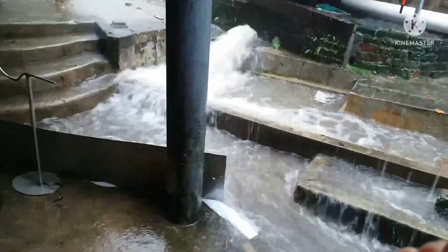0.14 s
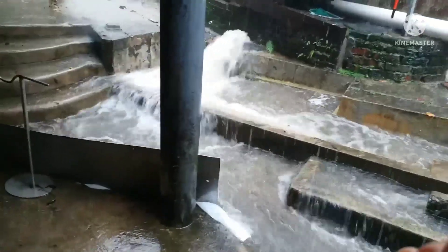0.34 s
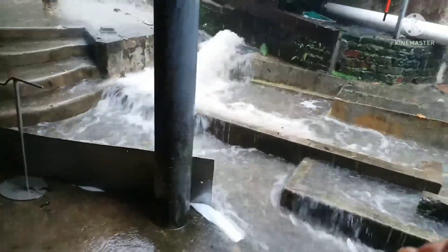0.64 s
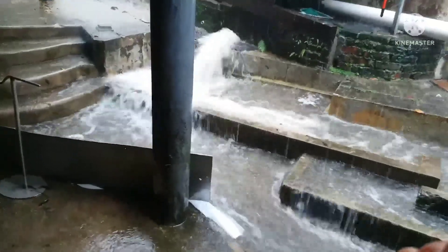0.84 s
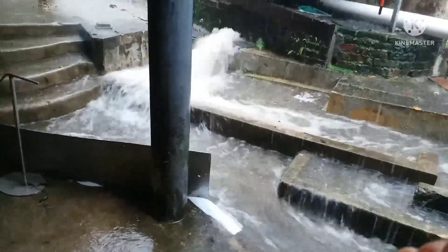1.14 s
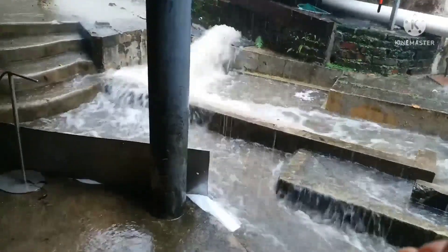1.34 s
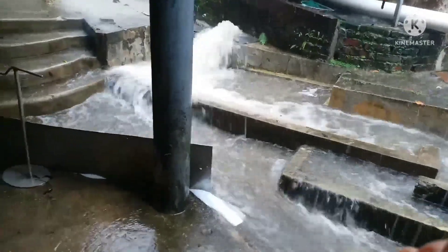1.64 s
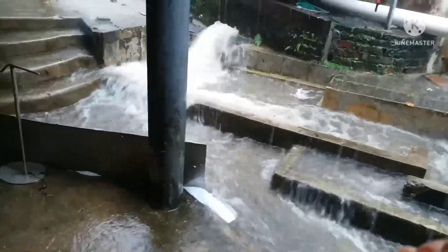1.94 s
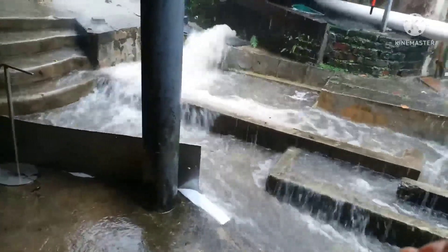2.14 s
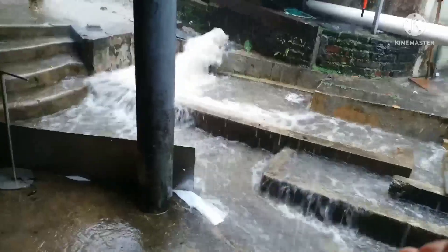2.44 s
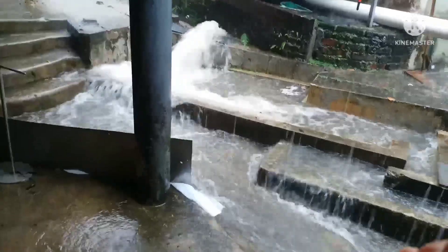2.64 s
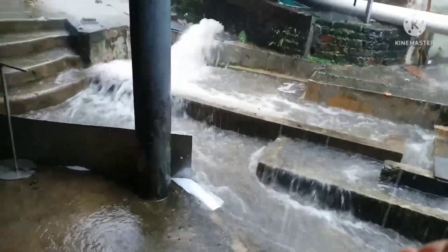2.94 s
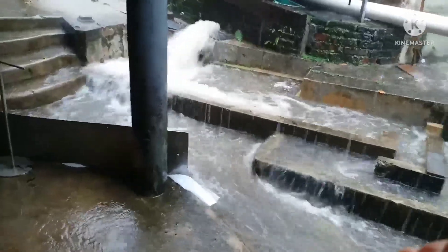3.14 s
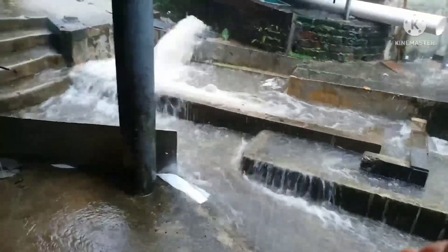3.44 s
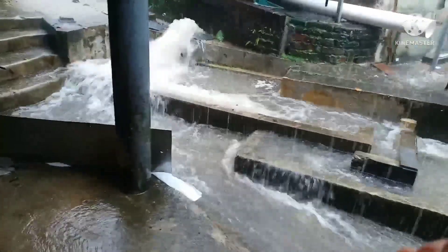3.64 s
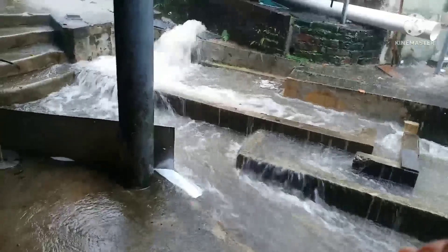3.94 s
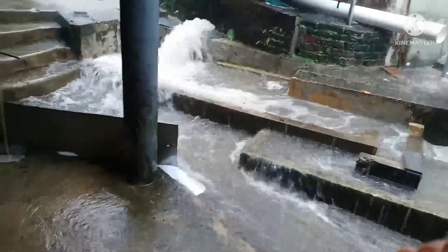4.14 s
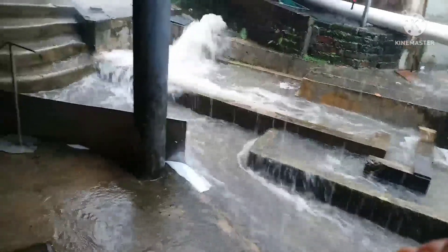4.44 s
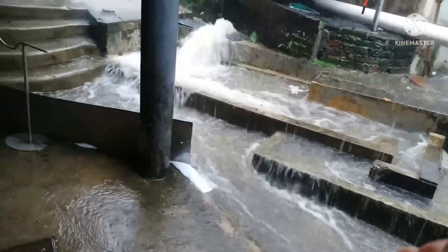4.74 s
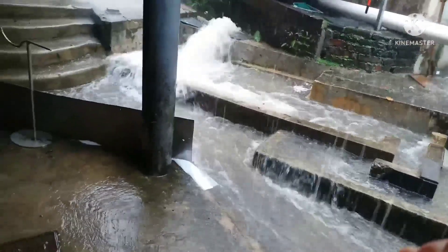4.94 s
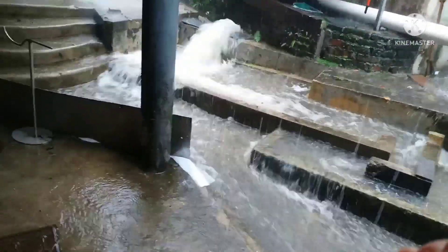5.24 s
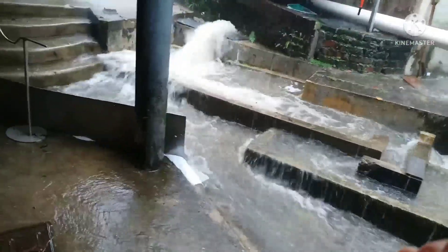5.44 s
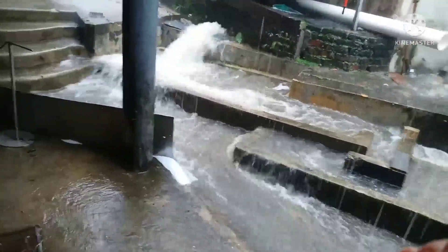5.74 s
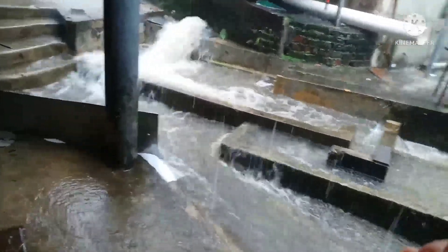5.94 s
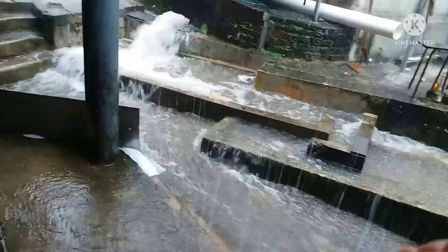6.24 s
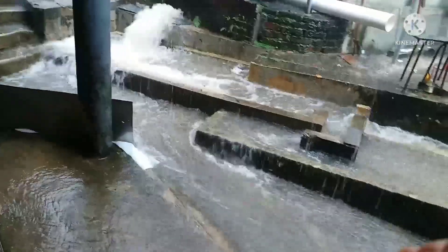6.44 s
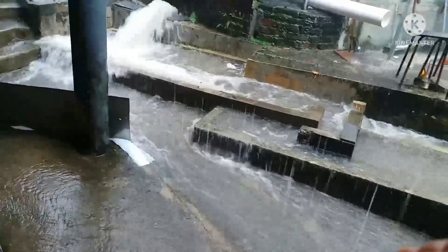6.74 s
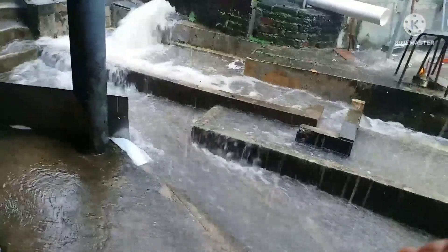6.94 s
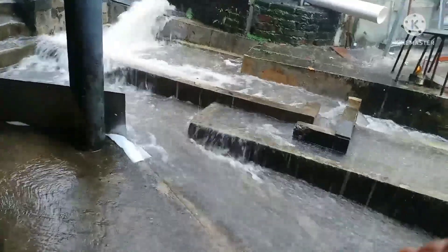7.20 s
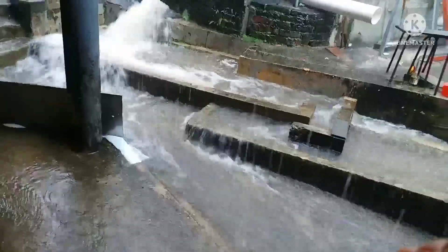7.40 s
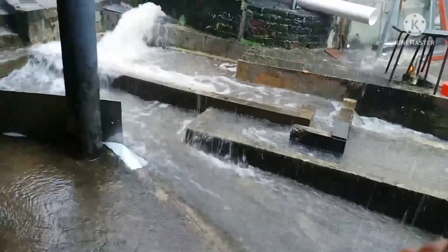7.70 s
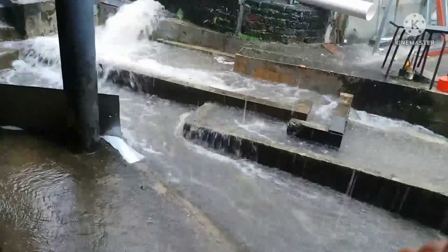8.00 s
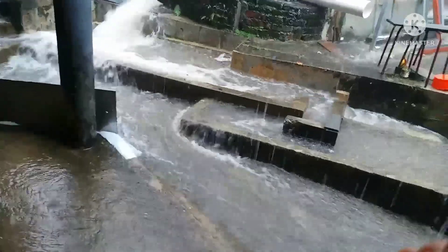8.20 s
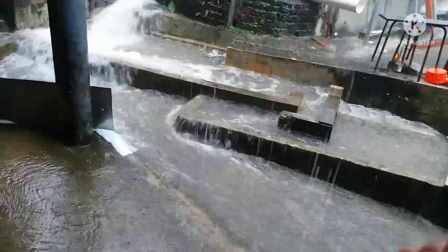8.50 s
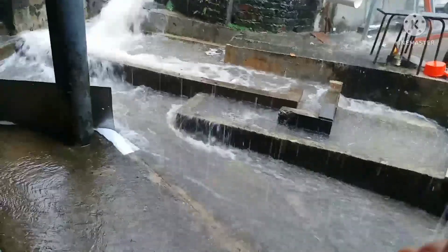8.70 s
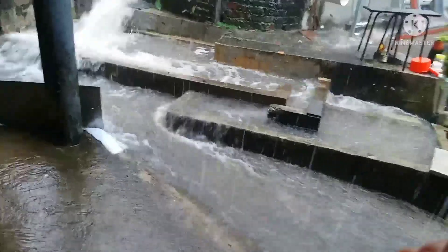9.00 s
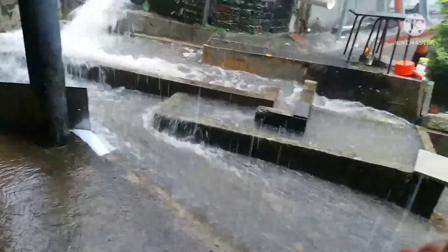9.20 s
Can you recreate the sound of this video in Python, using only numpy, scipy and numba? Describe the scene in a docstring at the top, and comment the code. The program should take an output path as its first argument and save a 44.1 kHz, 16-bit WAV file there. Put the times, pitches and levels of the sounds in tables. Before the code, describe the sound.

Heard in stereo on a phone sheltered under a porch, a wide, steady rush of floodwater cascades over concrete steps in heavy rain. Fine bubbling and ticking raindrops sit over the roar throughout, while heavy drips snap irregularly on the wet floor nearby, leaning right. The water dips a little early on, swells after halfway, then softens and rises toward the end.

```python
"""Floodwater pours down concrete steps in heavy rain, heard from under a porch roof on a two-port phone.
From the start, countless far splashes merge into a roar from all sides; nearer bubbles and raindrops fizz
over it, big drops smack close by, mostly on the right, and now and then a single bubble rings out.
The flow ebbs to its lowest near 3 s. At 4.2 s the boom of the air under the roof sinks in pitch;
the water surges highest near 5.3 s, eases, and builds again toward the end."""
import sys
import numpy as np
from scipy import signal
from scipy.fft import rfft, irfft, next_fast_len
from scipy.io import wavfile
from scipy.ndimage import uniform_filter1d
from numba import njit

SR = 44100
rng = np.random.default_rng(int(sys.argv[2]) if len(sys.argv) > 2 else 0)


def digitize_waveform(pressure):
    """Quantize a signal to 16-bit integers and store it at the path in sys.argv[1].

    Rows of a 2-D input are taken as channels; values are limited to [-1, 1].
    """
    field = np.atleast_2d(pressure).T
    bounded = np.clip(field, -1, 1)
    quanta = np.round(bounded * 32767).astype(np.int16)
    wavfile.write(sys.argv[1], SR, quanta)


N = 412776
FFT_SIZE = 2 * next_fast_len(N // 2 + 1)
PORT_GAP_S = 0.00051  # sound's travel time from one microphone port to the other


def roar(hz, spray_db, churn_db, plunge_db):
    """Far splashes too dense to tell apart: plunge in the bass, churn above it, flickering spray on top."""
    noise = surrounding_noise(hz)
    centres_hz = [200, 400, 800, 1600, 3000, 4500, 6300, 8500, 11000, 14000]
    band_index = np.interp(np.log(hz + 1), np.log(centres_hz), np.arange(len(centres_hz)))
    burst_db = spray_bursts()
    shared_db = 0.36 * flicker(34, drift_s=.09)
    out = 0
    for k in range(len(centres_hz)):
        band = np.clip(1 - abs(band_index - k), 0, 1)
        high, low = np.clip((k - 2) / 2, 0, 1), np.clip((1.5 - k) / 1.6, 0, 1)
        own_db = (.5 + 0.032 * k) * high * flicker(34, drift_s=.09)
        treble_db = spray_db + np.clip((k - 3) / 2, 0, 1) * burst_db + shared_db + own_db
        db = high * treble_db + (1 - high - low) * churn_db + low * plunge_db
        out = out + undb(db) * irfft(noise * band)[:, :N]
    return unit(out)


def surrounding_noise(hz):
    """Spectra of noise from all sides: alike at both ports only while the wavelength dwarfs their gap."""
    right_share, unlike_rumble = 0.055, .13
    left, independent = rfft(rng.standard_normal((2, FFT_SIZE)))
    around = (1 - right_share - unlike_rumble / (1 + (hz / 60) ** 2)) * np.sinc(2 * hz * PORT_GAP_S)
    alike = around + right_share * np.exp(2j * np.pi * hz * PORT_GAP_S * 0.75)
    right = alike * left + np.sqrt(1 - np.minimum(abs(alike) ** 2, 1)) * independent
    return np.array([left, right])


def spray_bursts():
    """Brief swells of treble hiss, in dB, as sheets of water burst into spray."""
    # swells (time [s], lift [dB], length [s]); rows at 0 dB are silent
    bursts = [(.23, 0, .05), (.35, 1.5, .06), (2.032, 1.5, 0.045), (2.6, 1.5, .05), (3.025, 1.2, .05),
              (5.33, 0, 0.11), (5.7, 0, .05), (6.33, 1.5, .06), (7.823, 1, .08), (8.42, 2.5, 0.045),
              (8.6, 3, .06), (8.953, 1.2, 0.068)]
    t = np.arange(N) / SR
    return sum(db * np.exp(-(2 * (t - s) / length) ** 2) for s, db, length in bursts)


def roof_drops(droplet_count=20, lesser_count=20):
    """Heavy drops off the roof edge, close by: a snap, its echo off the wet floor, scattering droplets."""
    # big drops (time [s], level at the nearer port [dB], pitch [Hz], left minus right [dB],
    # side [-1 left to 1 right], swell [cycles])
    big_drops = [(0.3415, -3, 10500, -10, .4, .5), (0.4628, -6, 3800, -6, .52, .55),
                 (0.5223, -9, 3800, -8, .3, .55), (0.7288, -12, 3200, -4, .45, .8),
                 (0.7772, -11, 3300, -6, .2, .55), (0.9127, -7, 4100, -8, .43, .5),
                 (1.5214, -10, 3350, -4, .48, .85), (1.6009, -10, 2600, -6, .3, .5),
                 (1.9553, -10, 7300, -7, .4, .5), (2.2089, -3.5, 2850, -6, .57, .48),
                 (2.2185, -13, 3100, -5, .5, .6), (2.2547, -12.5, 5000, -2, 0, .6),
                 (2.3122, -9, 4400, -9, .4, .45), (2.4928, -11, 4400, -6, .4, .5),
                 (2.5845, -6, 6000, -5, .2, .4), (3.1493, -11, 7500, -8, .6, .5),
                 (3.4001, -10, 7500, -12, .6, .5), (3.8085, -9, 1100, -1, -.15, .3),
                 (3.8729, -10, 3200, -7, .1, .5), (5.3805, -9, 9000, -5, .4, .5),
                 (5.4506, -8, 3000, -5, .2, .5), (5.6949, -6, 7600, -7, .43, .5),
                 (5.9102, -8.5, 3400, -4, 0, .5), (6.3429, -6, 4300, -4, .3, .5),
                 (6.5925, -9, 3300, -10, .6, .5), (6.762, -9, 3700, -7, .2, .5),
                 (7.2231, -8, 4600, -3, .2, .45), (7.5064, -10, 4400, -1, 0, .5),
                 (8.1223, -8, 3500, -7, .4, .5), (8.4236, -7.5, 4200, -4, .2, .5),
                 (8.5345, -8, 3000, -6, .3, .5), (8.6031, -6, 9000, -7, .4, .5)]
    # lesser drops fall at random within these ranges of the same columns
    low, high = np.transpose([(0, N / SR), (-15, -11), (4000, 10500), (-10, 3), (-.2, .7), (.4, .8)])
    lesser_drops = low + (high - low) * rng.random((lesser_count, len(low)))
    s, db, hz, pan_db, side, cycles = np.vstack([big_drops, lesser_drops]).T
    db = db - abs(pan_db) / 2
    hit = at_ports(s - cycles / hz, hz, cycles, db, pan_db, side, glide=0.03)
    floor_echo = np.roll(hit, int(.0021 * SR), axis=1)
    wait, pitch, faintness = rng.random((len(s), droplet_count, 3)).T
    wait_s = .003 - 0.019 * np.log(wait)
    droplet_hz = np.minimum(hz * undb(8 * pitch - 4), 9000)
    droplet_db = db - 12 - 8 * faintness - 120 * wait_s
    columns = np.broadcast_arrays(s + wait_s, droplet_hz, 2 * cycles, droplet_db, pan_db, side)
    droplets = at_ports(*(c.ravel() for c in columns), glide=0.052)
    smacks = undb(2.5) * hit + undb(-9) * floor_echo + droplets
    # a drop moves little air in the bass, and the ports dull the very top
    return signal.sosfilt(signal.butter(2, [350, 12000], "band", fs=SR, output="sos"), smacks)


def single_bubbles():
    """Bubbles ring out dead ahead of the microphone; the pitch climbs as each nears the surface."""
    # bubbles (time [s], level [dB], start pitch [Hz], swell [cycles], rise by the peak [fraction])
    bubbles = [(.905, -23, 510, 5, .03), (1.612, -25, 880, 7, .02), (2.5844, -19, 3700, 2.5, .02),
               (3.8105, -19.5, 560, 1.5, .03), (4.833, -20.5, 520, 3.5, .25), (5.065, -22, 340, 3, .05)]
    rows = np.array(bubbles, float)[:, :, None]
    return sum(at_ports(s, hz, cycles, db, 0, 0, rise[0]) for s, db, hz, cycles, rise in rows)


def rain():
    """Raindrops land as short ticks, nearer than the roar and leaning right."""
    return scatter(14000, 1920, 11400, cycles=0.5, spread_db=2, cap_db=9, glide=0.026, side=0.38)


def bubble_cloud(spray_db, churn_db):
    """Small bubbles fizz along with the spray; large ones glug along with the churn."""
    fizz = scatter(16000, 1204, 9060, cycles=4.8, spread_db=2.5, cap_db=11, glide=0.038, side=0.2)
    glugs = scatter(900, 253.2, 1110, cycles=2.88, spread_db=-1, cap_db=10.5, glide=0.0766, side=0.061)
    return undb(spray_db - 14) * fizz + undb(churn_db - 22) * glugs


def faint_tones(spray_db):
    """Faint, brief ringing tones at random pitches, following the spray."""
    tones = scatter(2500, 900, 6000, cycles=12.0, spread_db=2, cap_db=6, glide=0.01, side=0.2)
    return undb(spray_db - 17) * tones


def under_porch(water, hz):
    """The water as the ports hear it under the roof, where the air booms along with the plunge."""
    # colour of water and microphone together (frequency [Hz], gain [dB])
    colour = [(25, -23), (50, -18.5), (85, -13.5), (125, -9.5), (150, -3), (300, -4), (1000, -6),
              (1180, -6), (2100, -7.5), (2740, -7.5), (3600, -8), (4570, -9), (6200, -12), (6850, -13),
              (7400, -11), (8030, -9), (9190, -17), (11700, -18.5), (13000, -21.3), (14700, -24.5),
              (15300, -27)]
    # balance of the two ports (frequency [Hz], left minus right [dB])
    balance = [(100, -1), (700, -.5), (2500, 0), (6000, -3), (7000, -2.5), (7800, 2), (8800, -2),
               (14000, 0.5)]
    # resonances of the air under the roof (frequency [Hz], width [Hz], early gain [dB], late gain [dB])
    modes = [(110, 60, -1.5, -0.5), (174, 22, -2, 4.5), (194.3, 18, 7.5, 2.5), (262, 25, 1.5, 2.5),
             (398, 16, 1, 2), (505, 20, 1.5, -2), (525, 16, 3.5, 4), (660, 16, 0, 1.5),
             (860, 310, 2.5, 2.5), (1050, 53, 0.5, .5)]
    ports_db = on_hz(balance, hz) * np.array([[.5], [-.5]])
    coloured = rfft(water, FFT_SIZE) * undb(on_hz(colour, hz) + ports_db)
    boom_db = sum(np.outer(db, 1 / (1 + (2 * (hz - f) / width) ** 2)) for f, width, *db in modes)
    early, late = (irfft(coloured * undb(db))[:, :N] for db in boom_db)
    deepening = np.interp(np.arange(N) / SR, (4.2, 4.24), (0, 1))
    return early + (late - early) * deepening


def scatter(count, low_hz, high_hz, cycles, spread_db, cap_db, glide, side):
    """Grains at random moments, pitches, places and levels."""
    moment, pitch, place, chance = rng.random((count, 4)).T
    hz = low_hz * (high_hz / low_hz) ** pitch
    side = np.clip(side + 2 * place - 1, -1, 1)
    tilt_db = 5.46 * np.log2(hz / low_hz)  # makes up for the shortness of high grains
    db = np.minimum(-spread_db * np.log(chance), cap_db) + tilt_db
    return unit(at_ports(moment * N / SR, hz, np.full(count, cycles), db, -7 * side, side, glide))


def at_ports(s, hz, cycles, db, pan_db, side, glide):
    """Grains at both ports; those from the right (side +1) reach the left port later."""
    lag_s = side * PORT_GAP_S / 2
    return np.array([grains((s + k * lag_s) * SR, hz, cycles, undb(db + k * pan_db / 2), glide, N, SR)
                     for k in (1, -1)])


@njit
def grains(start, hz, cycles, size, glide, n, sr):
    """Each grain is a rising sine that swells over its cycles to about its size, then dies away."""
    out = np.zeros(n)
    for k in range(len(hz)):
        first = int(np.ceil(start[k]))
        step, fade = 2 * np.pi * hz[k] / sr, hz[k] / (cycles[k] * sr)
        turn, bend = np.exp(1j * step - fade), np.exp(1j * step * glide * fade)
        phasor = np.e * fade * size[k] * np.exp((1j * step - fade) * (first - start[k]))
        for j in range(max(first, 0), min(n, first + int(8 / fade))):
            out[j] += (j - start[k]) * phasor.imag
            phasor, turn = phasor * turn, turn * bend
    return out


def flicker(rate_hz, drift_s=None):
    """Random levels, held and slewed, less their mean over drift_s (or four holds); spread 1."""
    hold = int(SR / rate_hz)
    levels = uniform_filter1d(np.repeat(rng.standard_normal(N // hold + 1), hold), hold)[:N]
    drift = uniform_filter1d(levels, int(drift_s * SR) if drift_s else 4 * hold)
    return unit(levels - drift)


def curve(table):
    """A (time [s], level [dB]) table at every sample, about its mean."""
    db = np.interp(np.arange(N) / SR, *np.transpose(table))
    return db - db.mean()


def on_hz(table, hz):
    """A (frequency [Hz], gain [dB]) table read on a log axis."""
    points_hz, db = np.transpose(table)
    return np.interp(np.log(hz + 1), np.log(points_hz), db)


def undb(db):
    return 10 ** (np.asarray(db) / 20)


def unit(x):
    return x / np.sqrt(np.mean(x ** 2))


def scene():
    """Roar, rain and bubble cloud surge with the flow; close drops and single bubbles sit on top."""
    # flow down the steps (time [s], relative level [dB])
    flow = [(0, -23.5), (.48, -24), (.66, -25.5), (1.3, -26.5), (1.82, -25), (2.2, -24.5), (2.38, -26),
            (2.75, -27), (3.2, -27.5), (3.6, -26), (4.3, -24.5), (4.7, -24), (5.2, -23.5), (5.31, -22),
            (5.48, -23), (5.72, -22.5), (5.87, -23.5), (6.25, -24.5), (6.7, -25.5), (7.35, -26),
            (7.8, -24.5), (8.55, -24), (8.85, -24.5), (9.36, -24)]
    # rumble of the plunge on top of what the flow gives it (time [s], relative level [dB])
    rumble = [(0, 2), (.5, -0.5), (.75, 0.5), (.9, -1), (1.4, -1), (1.7, 0), (2.3, -0.5), (3.1, 0.5),
              (3.9, -.5), (4.6, 0), (5.03, 0), (5.25, -2), (5.45, 0), (6, -2), (6.2, 1), (6.95, 0),
              (7.3, -1.5), (7.6, -0.5), (8.5, 0.5), (9, 1), (9.36, 0)]
    flow_db, rumble_db = curve(flow), curve(rumble)
    spray_db = flow_db + .28 * flicker(10)
    churn_db = 0.98 * flow_db + 0.1 * rumble_db + .3 * flicker(7)
    plunge_db = 0.83 * flow_db + rumble_db + .6 * flicker(3.3)
    hz = np.arange(FFT_SIZE // 2 + 1) * SR / FFT_SIZE
    near = undb(spray_db - 13) * rain() + bubble_cloud(spray_db, churn_db) + faint_tones(spray_db)
    far = roar(hz, spray_db, churn_db, plunge_db)
    return undb(-19.5) * unit(under_porch(far + near, hz)) + roof_drops() + single_bubbles()


def record(dry):
    """The phone thins the deep bass and cuts the top."""
    bass_cut_hz, top_hz = 82, 15400
    thin = signal.sosfilt(signal.butter(2, bass_cut_hz, "high", fs=SR, output="sos"), dry)
    return signal.sosfilt(signal.ellip(14, .2, 105, top_hz, fs=SR, output="sos"), thin)


dry = scene()
out = record(dry)
digitize_waveform(out)
```